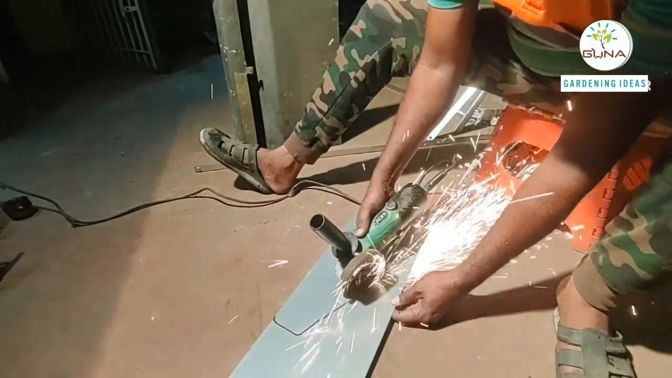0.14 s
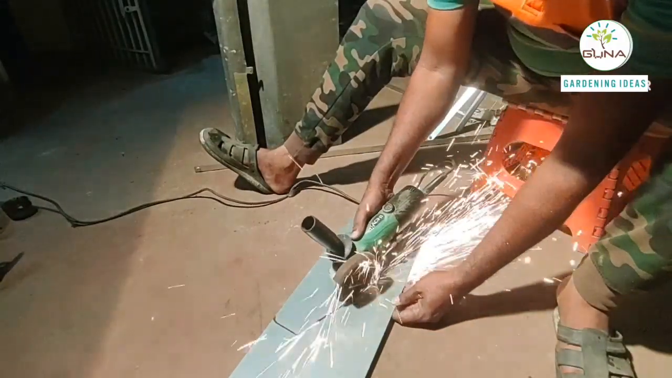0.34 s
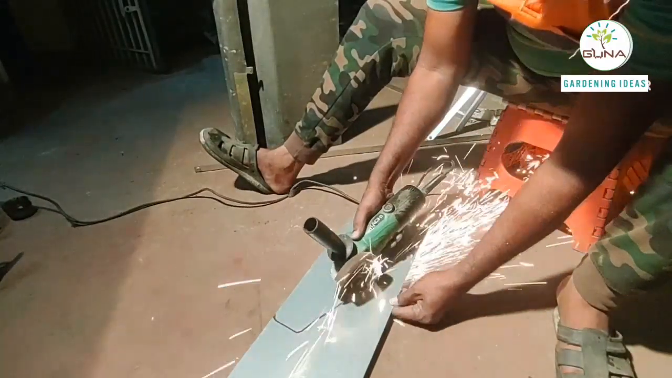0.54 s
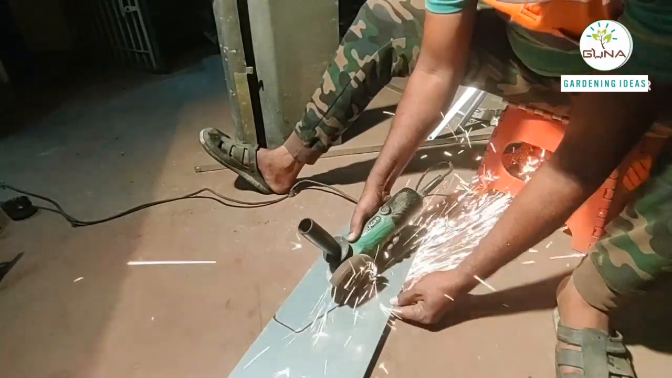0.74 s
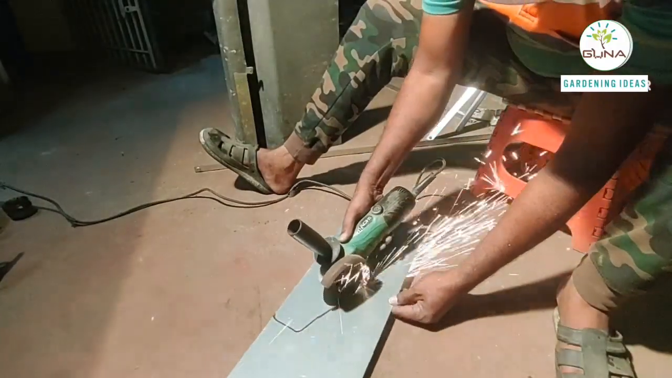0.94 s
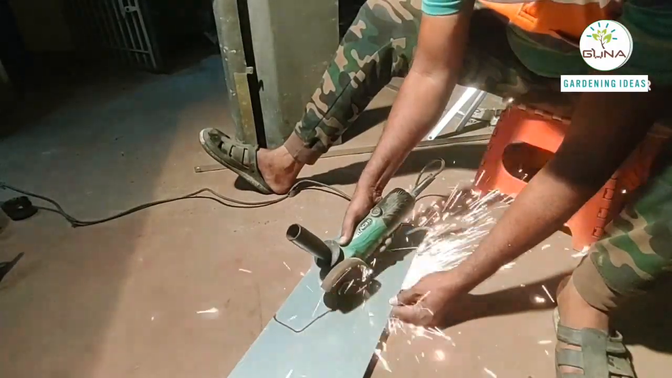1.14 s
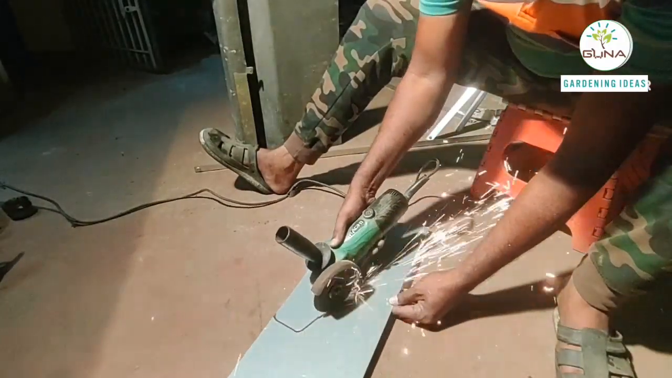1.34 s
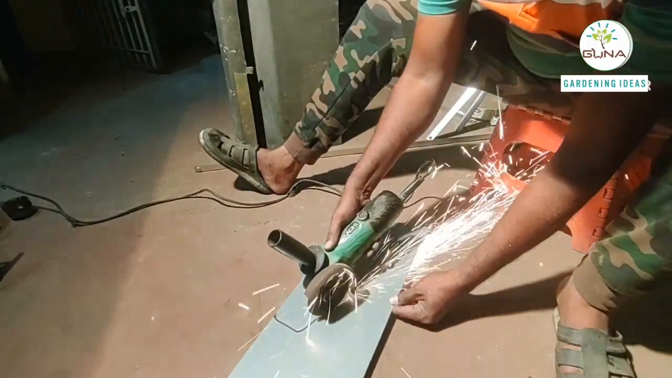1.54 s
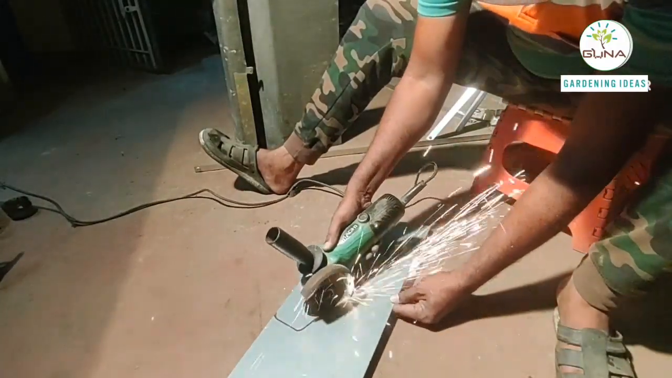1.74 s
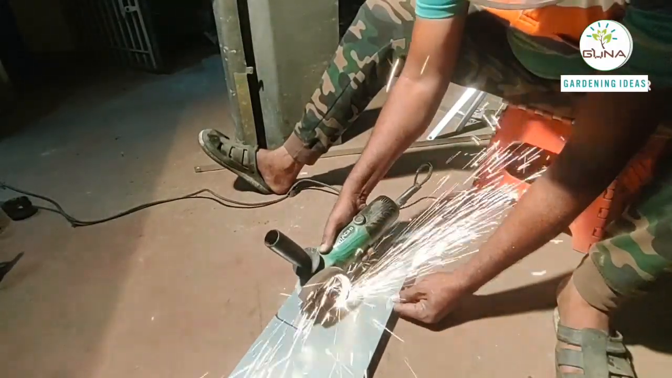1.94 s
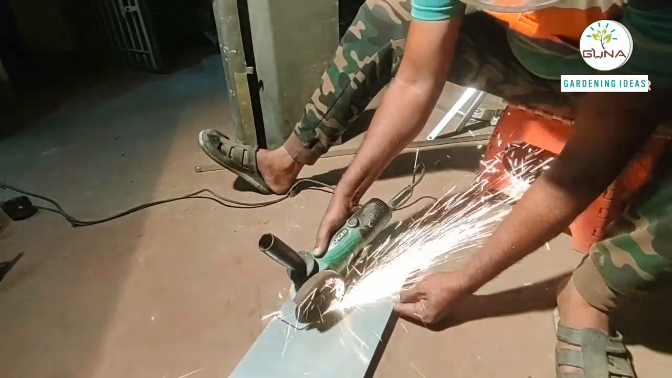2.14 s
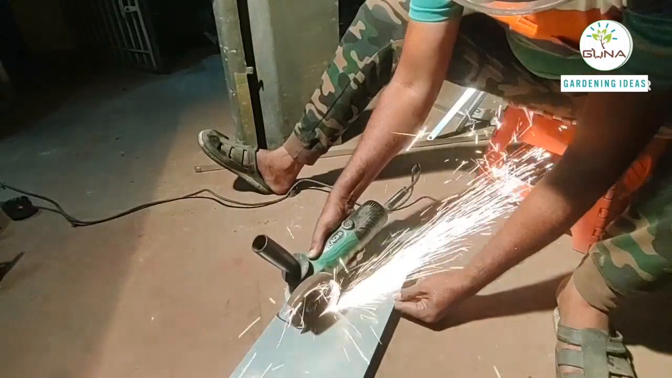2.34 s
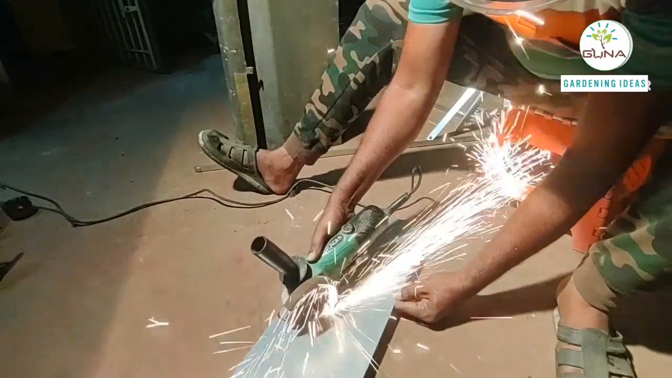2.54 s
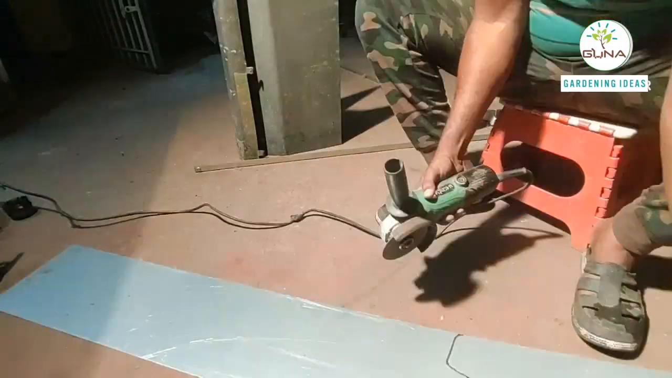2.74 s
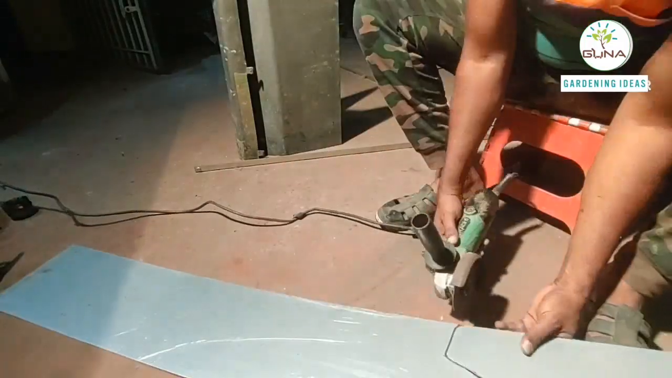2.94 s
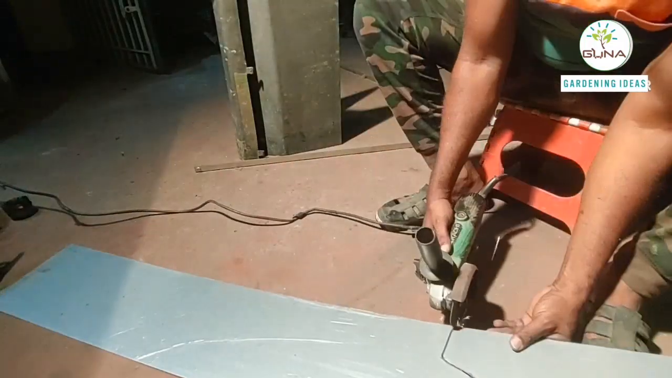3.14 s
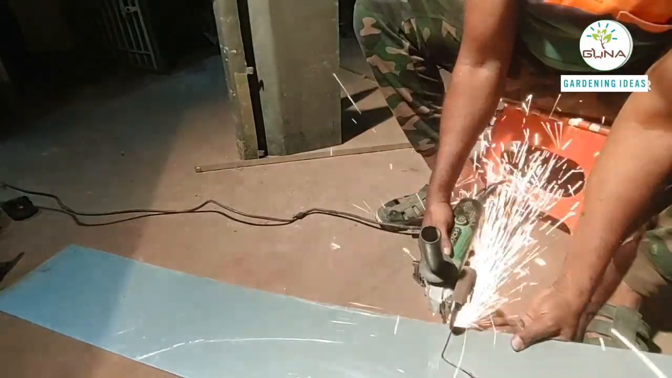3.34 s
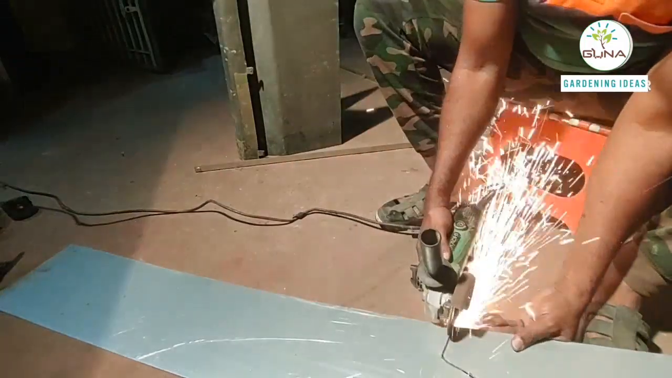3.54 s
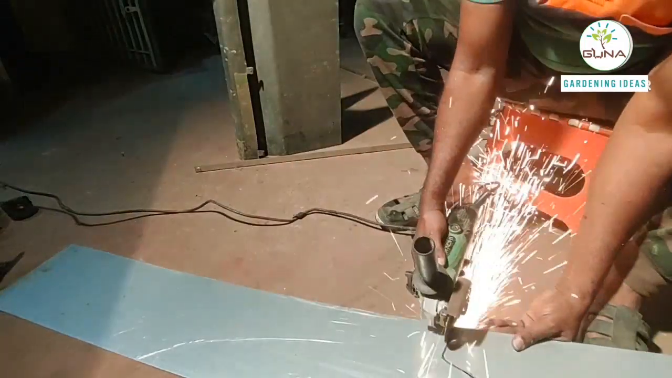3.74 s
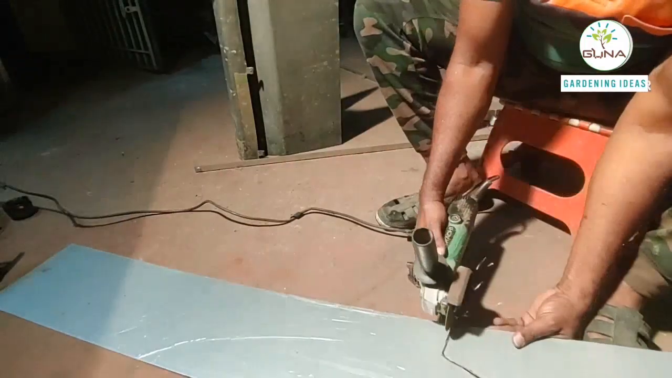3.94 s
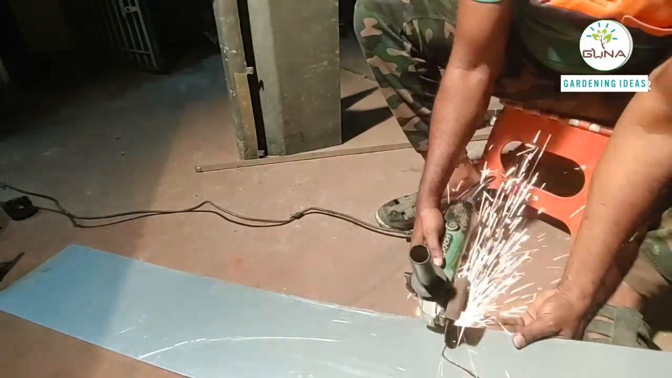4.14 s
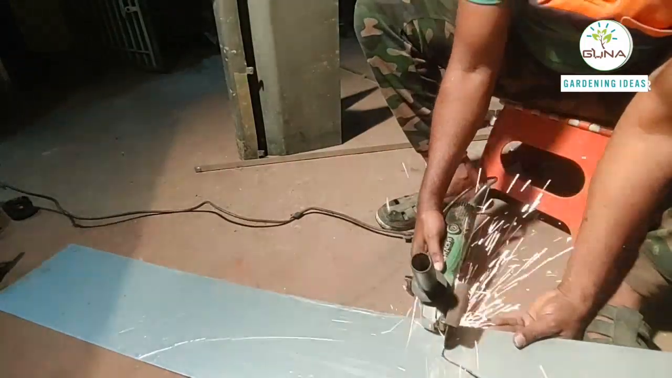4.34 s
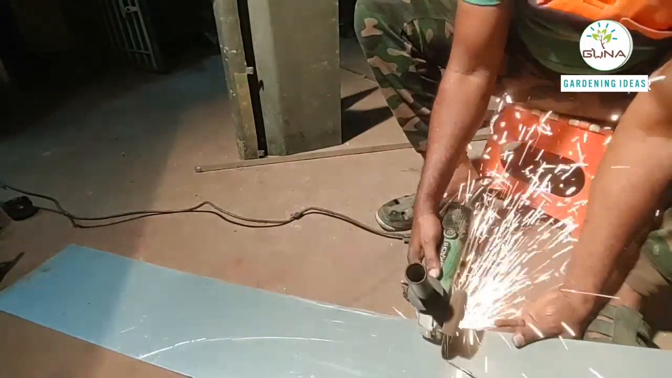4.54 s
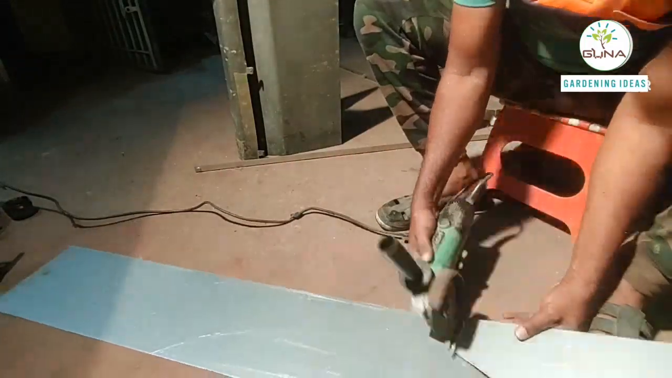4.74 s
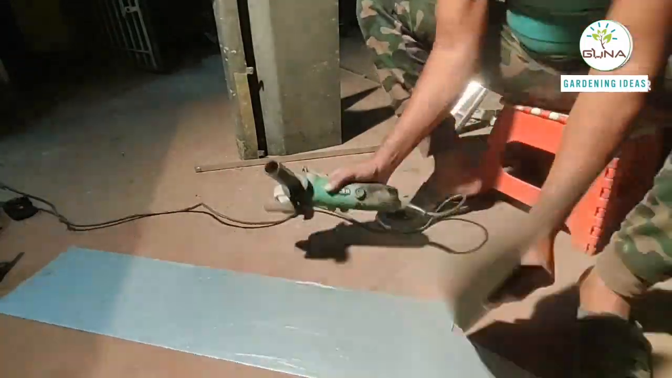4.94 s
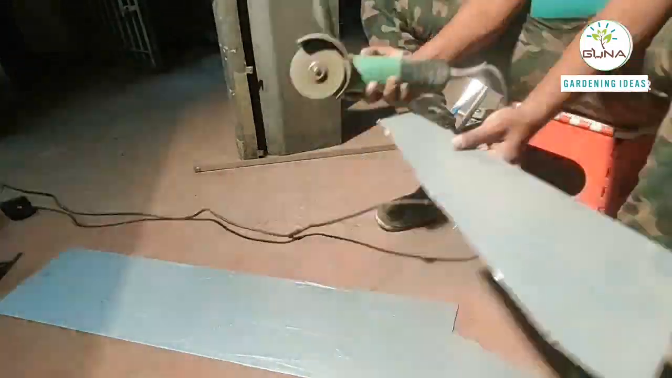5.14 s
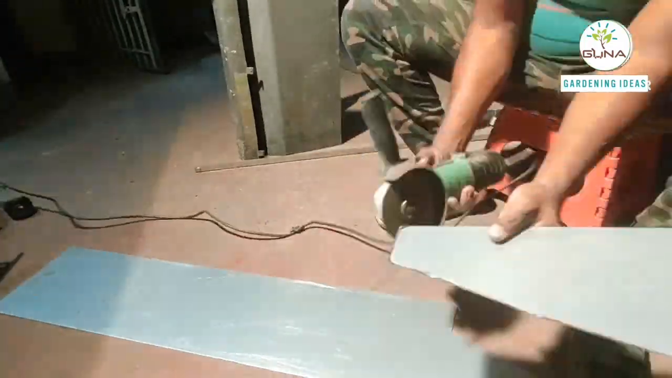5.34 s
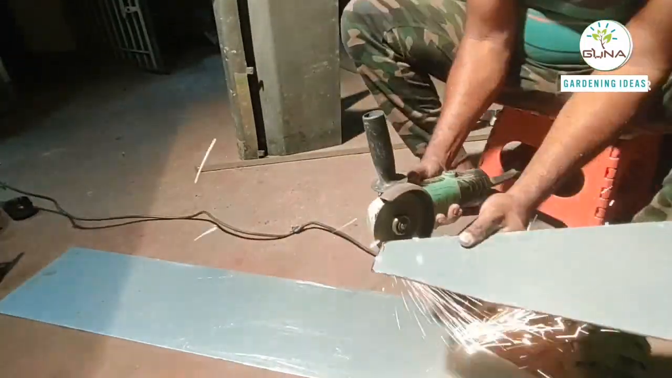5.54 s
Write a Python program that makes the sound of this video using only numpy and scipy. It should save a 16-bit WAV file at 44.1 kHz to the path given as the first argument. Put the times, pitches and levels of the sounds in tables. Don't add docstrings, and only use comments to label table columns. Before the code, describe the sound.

Shrill, wavering metal cutting by a handheld grinder, broken by airy free-running roars, small knocks, and a brief motor wind-down before cutting again.

```python
import sys
import numpy as np
from scipy import signal
from scipy.fft import next_fast_len
from scipy.io import wavfile
from scipy.ndimage import uniform_filter1d

SR = 44100
rng = np.random.default_rng(int(sys.argv[2]) if len(sys.argv) > 2 else 0)


def undo_db(level):
    steps = np.asarray(level, float) / 20
    return 10 ** steps


def wav_out(sig):
    wavfile.write(sys.argv[1], SR, np.round(np.clip(np.atleast_2d(sig).T, -1, 1) * 32767).astype(np.int16))


N = 251370
STEP = 64

# (frequency [Hz], level [dB])
HUM_TONES = [(398.4, -84.5), (796.7, -75.5), (1199, -70)]
# (frequency [Hz], density [dB per Hz])
RUMBLE_COLOUR = [(15, -21), (25, -8), (276, -12.5), (785, -5), (943, -5.5), (1180, -1.5), (1730, -5),
                 (2000, 0), (2600, -30), (4400, -120)]
# (start [s], end [s], bass level [dB], upper level [dB])
HANDLING = [(-.1, .32, -91, -75), (0.292, 1.548, -81.5, -77), (0.46, 0.712, -76, -63.5),
            (1.733, 1.956, -82, -65), (2.468, 2.558, -85.5, -84), (3.045, 4.02, -84, -71),
            (3.227, 3.316, -70, -58.5), (4.002, 4.12, -71, -59.5), (4.185, 4.262, -66, -54.5),
            (4.086, 4.961, -79.5, -73), (4.95, 5.497, -95, -64), (5.5, 5.8, -74.5, -73),
            (5.656, 5.8, -83, -50.5)]
# (time [s], peak level [dB])
KNOCKS = [(0.367, -47), (0.488, -50), (0.578, -66), (0.73, -44), (3.269, -41), (3.599, -46), (4.039, -37),
          (4.059, -81), (4.213, -46), (4.499, -41), (5.479, -70), (5.679, -41)]
# (frequency [Hz], left-right likeness [0 to 1])
LIKENESS = [(60, 0.093), (300, 0.58), (1000, 0.35), (2000, 0.64), (3500, 0.44), (5000, 0.86), (8000, 0.38),
            (12000, 0.91)]
# (frequency [Hz], left over right [dB])
LEAN = [(60, 3.0), (180, 3.0), (550, 2.0), (1650, 0.0), (4970, 0.5), (15000, 0.5)]
# (time [s], lead of the left port [microseconds])
BEARING = [
    (0, 20.5),
    (1.2, 13),
    (2.75, 14),
    (2.9, -18.5),
    (5.7, -6),
]
# (time [s], level [dB])
LEVEL_STEPS = [
    (2.853, 5),
    (5.389, 3),
]
# (start [s], end [s], bite on entering [dB], bite on leaving [dB])
CUTS = [
    (-.1, 2.8, 1, -1),
    (3.24, 3.945, 4, -5),
    (4.23, 4.8, 0, -4),
    (5.52, 5.8, -4, -5),
]
# (time [s], speed aimed at [Hz], time constant [s])
LOADS = [(0, 908, .085), (.4, 985, 0.075), (0.866, 1161.5, 0.046), (1.019, 984.5, 0.12),
         (1.28, 1201.5, .012), (1.299, 990, .16), (1.769, 1108.5, .017), (1.8, 1040, 0.041),
         (1.881, 1076, 0.075), (1.98, 1022.5, 0.032), (2.129, 901.5, 0.47), (2.365, 999.5, 0.072),
         (2.5, 924.5, 0.071), (2.851, 1394.5, 0.02), (3.27, 1005, .18), (3.929, 1419, 0.052),
         (4.2, 946.5, .058), (4.415, 1189, 0.05), (4.489, 1069.5, 0.039), (4.601, 1091, .12),
         (4.76, 1519, .15), (4.96, -1, 0.42), (5.385, 1428, 0.013), (5.52, 1254, 0.063)]
# (time [s], pressure on the disc [dB], freedom of the sheet to ring [dB])
PUSH = [(0, 3.5, 3), (.15, -4, -10), (.45, -4, 0.5), (.78, 2.5, -14), (1.0, -5, 13.5), (1.22, -3.5, 6),
        (1.34, 1.5, 8.5), (1.65, -1.5, 13.5), (1.87, 1.5, -4), (1.97, 3, 6.5), (2.46, 3, 9.5), (2.7, 6, 5),
        (3.3, 1, 0), (3.65, 1, 0), (3.9, 6.5, -24), (4.3, 0.5, -11), (4.6, 4, -6.5), (5.6, -20, 15)]
# (start [s], end [s], rise [s], broad roar [dB], whistle of the vents near 10 kHz [dB])
ROARS = [
    (2.781, 3.231, 0.04, 1, 2.5),
    (3.2, 3.316, 0.019, -9, -7),
    (3.933, 4.059, 0.04, -2, -4),
    (4.044, 4.28, 0.018, -10.5, -13),
    (4.717, 5.403, .16, -5, -6.5),
    (5.352, 5.502, 0.051, -3.5, -1),
    (5.43, 5.504, 0.093, -29, 5.5),
    (5.477, 5.804, 0.0078, -14, -1),
]
FAN_DB = [-42.5, -38.5, -24.5, -31]
FAN_LAW = [1.8, 1.45, 2.7, 2.5]
GRIT_DB = [-49, -37, -39.5, -34]
GRIT_PRESSED = [0.88, 1.01, 0.75, 0.17]
GRIT_RINGS = [0.2, 0.61, 0.53, -0.025]
HISS_BORDERS = [1800, 5500, 8500, 12500, 15700]
# (frequency [Hz], density [dB per Hz])
ABRASION = [(710, -54), (1200, -80), (1730, -18), (3440, -13.5), (5450, -16.5), (6000, -14.5), (8110, -5.5),
            (9220, 9), (10400, 5.5), (14800, 26), (15600, 23)]
# (frequency [Hz], density [dB per Hz])
FAN = [(710, -50), (1200, -20), (1490, -51), (2030, -25.5), (2630, -13), (7200, -21), (8110, -18),
       (10900, -2), (14600, 4.5), (15600, 12)]
# (start [s], end [s], from [Hz], to [Hz], level [dB])
SWISHES = [
    (2.88, 3.3, 15400, 15330, 1.5),
    (3.3, 4.8, 15400, 15900, 1.5),
    (2.63, 2.753, 9190, 9300, 3),
    (4.98, 5.16, 9050, 13600, -2),
    (5.172, 5.241, 11700, 6400, 9.5),
    (5.22, 5.325, 6800, 6300, 9.5),
    (5.272, 5.397, 10200, 9600, 10.5),
    (5.362, 5.479, 5870, 8500, 11.5),
]
# (time [s], level [dB])
WHINE = [(0, -64), (1.5, -56), (2.75, -57), (2.85, -85), (3.4, -73), (3.52, -55), (3.85, -59), (4.0, -49),
         (4.05, -85), (4.3, -66), (4.6, -57), (4.96, -51.5), (5.1, -53), (5.218, -50), (5.37, -64),
         (5.39, -85), (5.52, -59), (5.7, -55)]
# (frequency [Hz], level [dB])
BITE = [(900, -88), (2100, -66), (3100, -60), (4500, -60), (7000, -53), (10500, -50.5), (15000, -48)]
# (frequency [Hz], half width [Hz], level [dB])
SHEET_PEAKS = [(6316, 273, -46), (7200, 150, -57), (9300, 290, -49), (12440, 190, -52), (14800, 420, -46.5)]
# (start [s], end [s], multiple, level [dB])
SQUEALS = [(0.0, 0.13, 11, -46), (0.08, 0.49, 8, -43), (0.12, 0.5, 16, -44), (1.12, 1.3, 9, -43),
           (.1, .91, 7, -43), (0.7, 0.9, 15, -42), (1.05, 1.3, 7, -41.5), (1.13, 1.25, 15, -40),
           (1.19, 1.51, 8, -46), (.65, .9, 9, -46), (1.37, 2.06, 14, -44), (1.5, 1.84, 9, -40),
           (1.51, 1.89, 7, -39.5), (1.99, 2.3, 12, -44), (2.0, 2.66, 6, -42), (2.22, 2.5, 13, -42),
           (2.24, 2.41, 7, -39), (2.3, 2.54, 9, -42), (2.35, 2.6, 15, -43), (2.6, 2.76, 10, -35),
           (2.64, 2.72, 16, -39), (3.3, 3.65, 10, -45), (3.3, 3.64, 8, -49), (3.55, 3.82, 6, -50),
           (3.48, 3.9, 2, -60), (3.65, 3.92, 5, -53), (3.75, 3.92, 15, -38), (4.3, 4.39, 15, -42),
           (4.6, 4.75, 5, -47), (5.55, 5.7, 5, -51)]
# (frequency [Hz], share [0 to 1])
DROPOUTS = [(1300, 0.001), (1900, .16), (2400, .1), (2950, .36), (3600, .22), (4200, .25), (5600, 0.001)]


def to_db(gain):
    return 20 * np.log10(gain + 1e-9)


def rms_one(x):
    return x / np.sqrt(np.mean(x ** 2) + 1e-20)


def clock():
    return np.arange(0, N + STEP, STEP) / SR


def in_time(rows):
    s, *columns = np.transpose(rows)
    return [np.interp(clock(), s, column) for column in columns]


def full(slow):
    return np.interp(np.arange(N) / STEP, np.arange(len(slow)), slow)


def at_hz(points, hz):
    table_hz, values = np.transpose(points)
    return np.interp(np.log(hz), np.log(table_hz), values)


def gate(start, end, rise_s, fall_s):
    return np.clip(np.minimum((clock() - start) / rise_s, (end - clock()) / fall_s), 0, 1)


def drift(rate_hz):
    r = np.exp(-2 * np.pi * rate_hz * STEP / SR)
    white = rng.standard_normal(len(clock()) + 999)
    return rms_one(signal.lfilter([1], [1, -2 * r, r * r], white)[999:])


def noise_set():
    mid, side = rng.standard_normal((2, 2, N))
    twin = signal.hilbert(mid, next_fast_len(N))[:, :N].imag
    return np.stack([mid, twin, side], axis=1)


def stereo_band(white, low, high, lead_s, free):
    band = signal.butter(2, [low, high], "band", fs=SR, output="sos")
    mid, twin, side = signal.sosfilt(band, white)
    hz = np.sqrt(low * high)
    unlike = np.clip(1 - at_hz(LIKENESS, hz), .01, 1) * (1 - .6 * free * (hz < 3000))
    shared = np.sqrt(1 - unlike / 2)
    phase = np.pi * hz * (lead_s + 7e-6 * rng.standard_normal())
    same = full(np.cos(phase) * shared) * mid
    other = full(np.sin(phase) * shared) * twin - full(np.sqrt(unlike / 2)) * side
    lean = undo_db(at_hz(LEAN, hz) * np.array([[.5], [-.5]]))
    return np.array([same - other, same + other]) / np.std(mid) * lean


def mains_hum():
    s = np.arange(N) / SR
    hum = sum(undo_db(db) * np.sin(2 * np.pi * hz * s) for hz, db in HUM_TONES)
    return np.sqrt(2) * hum * full(undo_db(-4) + undo_db(1.36) * gate(4.76, 5.52, 0.12, 0.049))


def knocks():
    clicks = np.zeros(N)
    for s, db in KNOCKS:
        clicks[round(s * SR)] = undo_db(db + 19.5)
    dull = signal.butter(2, [30, 700], "band", fs=SR, output="sos")
    return signal.sosfilt(dull, clicks + 1e-18) * undo_db([[1.5], [-1.5]])


def rumble(touching, lead_s, body_db):
    edges = np.geomspace(20, 1800, 12)
    out, white, lumps = 0, noise_set(), drift(58)
    shakes = np.array([gate(a, b, 0.037, 0.087) for a, b, *_ in HANDLING])
    shake_bass_db, shake_upper_db = np.transpose(HANDLING)[2:]
    bass_db = to_db(undo_db(-89) + undo_db(shake_bass_db) @ shakes)
    upper_db = -64 + 0.67 * (body_db - body_db.mean())
    upper_db = to_db(np.hypot(undo_db(upper_db), undo_db(shake_upper_db) @ shakes))
    for k, (low, high) in enumerate(zip(edges, edges[1:])):
        hz = np.sqrt(low * high)
        bass = np.clip(np.log(500 / hz) / 1.2, 0, 1)
        level_db = at_hz(RUMBLE_COLOUR, hz) + 10 * np.log10(high - low) - 27
        level_db += (1 - bass) * upper_db + bass * (bass_db + 13.5)
        level_db += (2.0 + 3 * bass) * lumps + 1.0 * drift(27)
        out = out + full(undo_db(level_db)) * stereo_band(white[k % 2], low, high, lead_s, 1 - touching)
    return out


def loose_sheet():
    s, out = np.arange(N) / SR, 0
    for hz, db in [(1320, -62.5), (1540, -61)]:
        band = signal.butter(2, [hz - 30, hz + 30], "band", fs=SR, output="sos")
        out = out + undo_db(db) * rms_one(signal.sosfilt(band, rng.standard_normal(N)))
    return out * np.clip(np.minimum(s - 2.53, 2.76 - s) * 20, 0, 1)


def contact():
    touching, bite_db = 0, 0
    for start, end, enter_db, leave_db in CUTS:
        cut = gate(start, end, .02, .02)
        touching = touching + cut
        bite_db = bite_db + cut * np.interp(clock(), [start, end], [enter_db, leave_db])
    return touching, bite_db


def disc_speed():
    s, now_hz = clock(), 1331
    hz = np.zeros(len(s))
    ends = [row[0] for row in LOADS[1:]] + [s[-1] + 1]
    for (start, aim_hz, lag_s), end in zip(LOADS, ends):
        approach = aim_hz + (now_hz - aim_hz) * np.exp(-np.maximum(s - start, 0) / lag_s)
        hz = np.where(s >= start, approach, hz)
        now_hz = aim_hz + (now_hz - aim_hz) * np.exp(-(end - start) / lag_s)
    hz[0] = 1331
    tremor_hz, swing_hz, top_s = 17.3, 20, .535
    return hz + swing_hz * gate(.3, .86, 0.0533, .15) * np.cos(2 * np.pi * tremor_hz * (s - top_s))


def grit_and_fan_levels(speed, touching):
    pressure_db, ringing_db = in_time(PUSH)
    grit_db = np.c_[GRIT_DB] + np.c_[GRIT_PRESSED] * pressure_db + np.c_[GRIT_RINGS] * ringing_db
    grit_db = grit_db + to_db(touching) + np.array([drift(6) for _ in GRIT_DB])
    facing = undo_db(-13.5)
    for start, end, rise_s, roar_db, whistle_db in ROARS:
        region_db = np.c_[[roar_db, roar_db, whistle_db, roar_db]]
        facing = facing + undo_db(region_db) * gate(start, end, rise_s, 0.031)
    free_hz = 1490
    return grit_db, np.c_[FAN_DB] + to_db(facing) + np.c_[FAN_LAW] * to_db(speed / free_hz)


def hiss(gritty, load_db, lead_s, region_db):
    edges = np.r_[np.geomspace(1500, 5500, 8), np.arange(6200, 16100, 700)]
    centres, borders = np.sqrt(edges[1:] * edges[:-1]), np.array(HISS_BORDERS)
    group = np.searchsorted(borders, centres) - 1
    share = gritty[np.maximum(group, 0)]
    colours = np.c_[at_hz(ABRASION, centres)] * share + np.c_[at_hz(FAN, centres)] * (1 - share)
    shape = colours + 10 * np.log10(np.diff(edges))[:, None]
    sums = [10 * np.log10(np.sum(undo_db(2 * shape[group == g]), axis=0)) for g in range(4)]
    trim = region_db - sums - 4.38 * gritty
    place = np.interp(np.log(centres), np.log(borders[1:] * borders[:-1]) / 2, range(4))
    white = noise_set()
    white *= undo_db(0.387 * uniform_filter1d(rng.standard_normal(N), size=16))
    together, out = 0.67 * drift(47) + 0.043 * load_db, 0
    for k, p in enumerate(place):
        weights = np.clip(1 - abs(p - np.arange(4)), 0, 1)
        level_db = shape[k] + weights @ trim + together + 1.33 * drift(14)
        for start, end, from_hz, to_hz, db in SWISHES:
            patch_hz = np.interp(clock(), [start, end], [from_hz, to_hz])
            off = np.log2(patch_hz / centres[k]) / .2
            level_db += db * gate(start, end, 0.013, 0.011) * np.exp(-off ** 2)
        band = stereo_band(white[k % 2], edges[k], edges[k + 1], lead_s, 1 - share[k])
        out = out + full(undo_db(level_db)) * band
    return out


def fan_whine(turn):
    level_db = in_time(WHINE)[0] + 0.53 * drift(25)
    whine = full(undo_db(level_db)) * np.sin(3.25 * turn)
    return np.sqrt(2) * np.array([whine, whine])


def squeal(speed, turn, touching, bite_db, load_db, lead_s):
    s, out = clock(), 0
    pressure_db, ringing_db = in_time(PUSH)
    pressure_db = np.minimum(pressure_db, 2)
    light_db = 0.2 * np.maximum(speed - 987.4, 0)
    ringing_db = 1.5 * ringing_db - light_db
    bite_db = bite_db - .06 * light_db
    for k in range(1, 18):
        hz = k * speed
        push = 1 if k < 7 else .5
        gain = undo_db(at_hz(BITE, hz) + bite_db + push * pressure_db + 3 * drift(8))
        for peak_hz, width_hz, db in SHEET_PEAKS:
            gain += undo_db(db + ringing_db) * np.exp(-((hz - peak_hz) / width_hz) ** 2)
        for start, end, multiple, db in SQUEALS:
            if multiple == k:
                edge = np.clip(np.minimum(s - start, end - s) / .06 + .3, 0, 1)
                gain += edge * undo_db(db + 0.5)
        gain *= (hz < 16500) * touching
        gain *= undo_db(load_db + 2.8 * drift(28) + 2.5 * drift(120) - 2)
        lag = full(np.pi * hz * lead_s + 0.052 * k * drift(3.7))
        lean = full(undo_db(0.2 * k * drift(3.2)))
        ports = np.array([lean * np.sin(k * turn + lag), np.sin(k * turn - lag) / lean])
        out = out + np.sqrt(2) * full(gain) * ports
    return out


def level_steps():
    s, total_db = np.arange(N) / SR, 0
    for at, db in LEVEL_STEPS:
        total_db = total_db + db * np.sign(s - at) * np.clip(1 - abs(s - at) / .025, 0, 1)
    return undo_db(total_db)


def scene_change():
    at_s, out_s, in_s = 2.823, 0.12, .13
    return full(undo_db(-17 * gate(at_s - out_s, at_s + in_s, out_s, in_s)))


def scene():
    speed = uniform_filter1d(disc_speed(), size=7)
    touching, bite_db = contact()
    lead_s = in_time(BEARING)[0] / 10 ** 6
    slowing_hz = uniform_filter1d(speed, size=50) - speed
    load_db = np.clip(0.043 * slowing_hz, -4, 4) * touching
    turn = 2 * np.pi * np.cumsum(full(speed * (1 + .0014 * drift(100)))) / SR
    grit_db, fan_db = grit_and_fan_levels(speed, touching)
    power = undo_db(2 * grit_db) + undo_db(2 * fan_db)
    gritty, hiss_db = undo_db(2 * grit_db) / power, to_db(power) / 2
    ground = rumble(touching, lead_s, hiss_db[0]) + knocks()
    tool = hiss(gritty, load_db, lead_s, hiss_db) + fan_whine(turn)
    tool = tool + squeal(speed, turn, touching, bite_db, load_db, lead_s)
    shake = 1 + .16 * full(touching) * np.cos(turn / 4)
    return scene_change() * (level_steps() * shake * (tool + ground) + mains_hum()) + loose_sheet()


def dropouts(x):
    hz, s, cells = signal.stft(x, SR, nperseg=1024, noverlap=768)
    band, moment = np.arange(len(hz)) // 4, np.arange(len(s)) // 4
    chance = rng.standard_normal((band[-1] + 1, len(s) // 4 + 1))
    chance = uniform_filter1d(chance, size=3, axis=1)
    rank = chance.argsort(axis=1).argsort(axis=1) / chance.shape[1]
    keep = rank[band][:, moment] >= at_hz(DROPOUTS, hz + 1)[:, None]
    size = abs(cells.mean(0))
    keep |= uniform_filter1d(size, size=3, axis=0) > 2.8 * uniform_filter1d(size, size=25, axis=0)
    return signal.istft(cells * np.maximum(keep, .02), SR, nperseg=1024, noverlap=768)[1][:, :N]


def band_limit(x):
    return signal.sosfilt(signal.butter(12, 16830, fs=SR, output="sos"), x)


def record(dry):
    steep = signal.ellip(12, .5, 75, 15500, fs=SR, output="sos")
    mix = dropouts(signal.sosfilt(steep, dry))
    return band_limit(mix)


dry = scene()
out = record(dry)
wav_out(out)
```